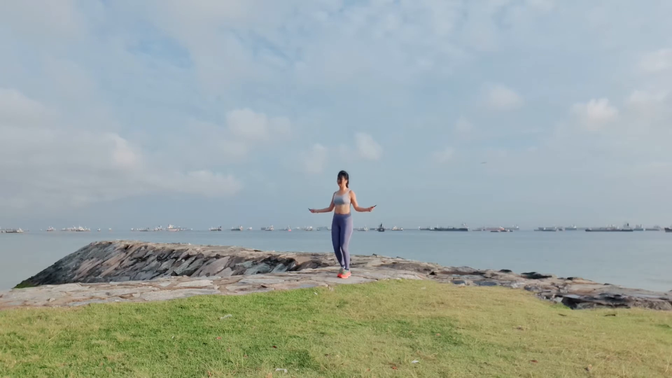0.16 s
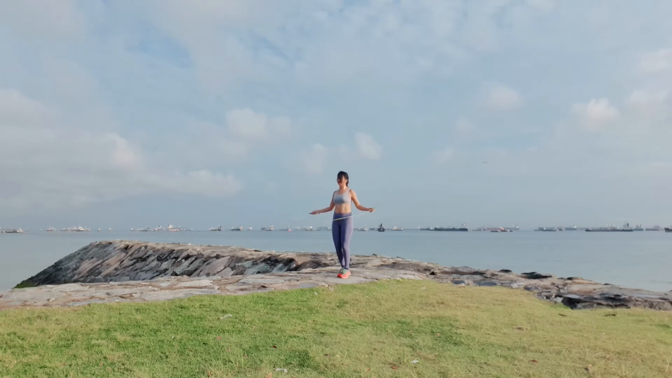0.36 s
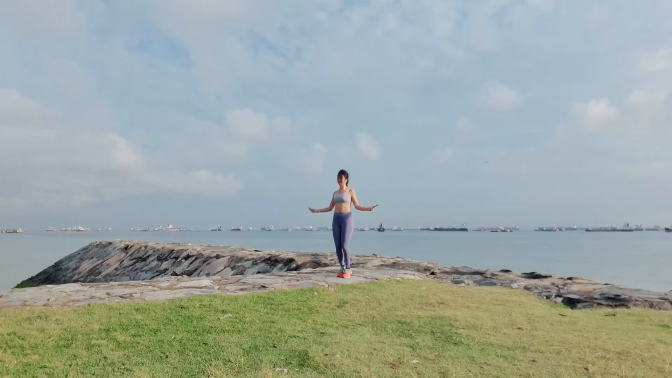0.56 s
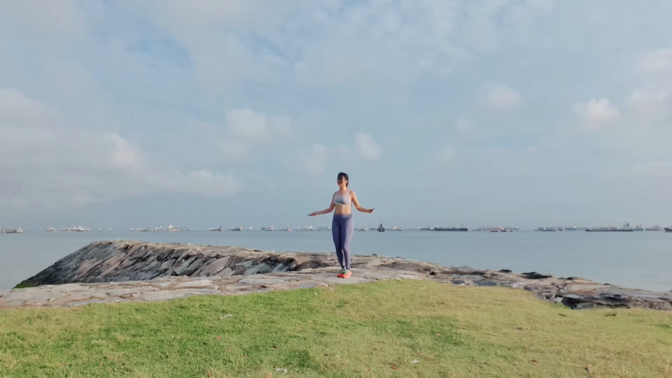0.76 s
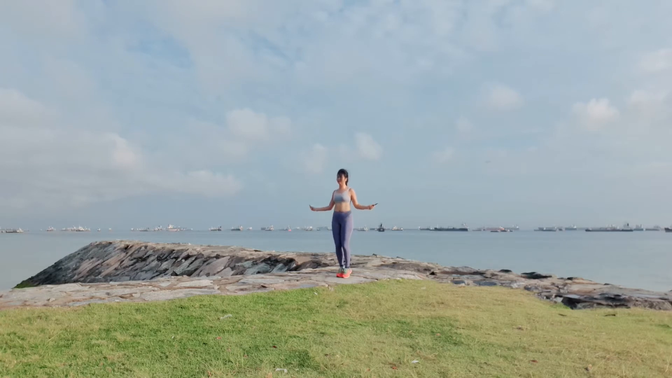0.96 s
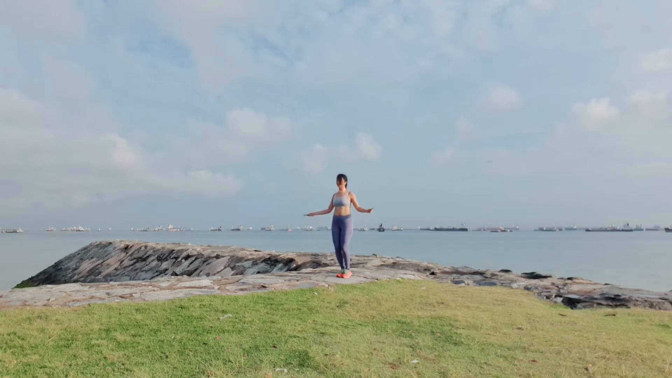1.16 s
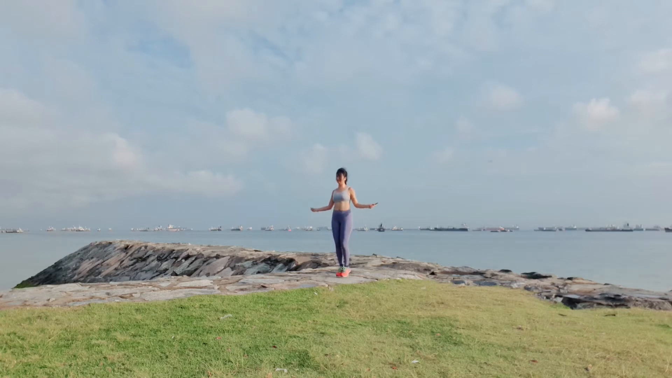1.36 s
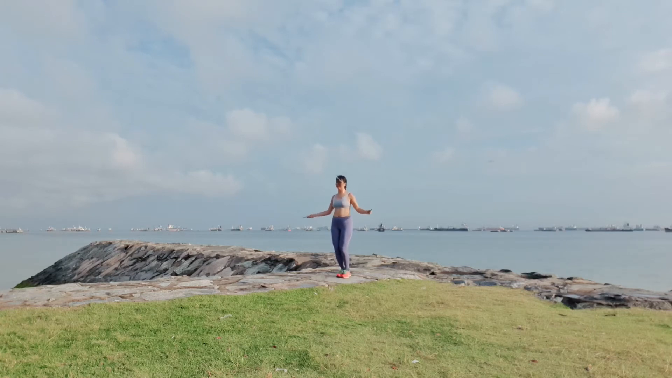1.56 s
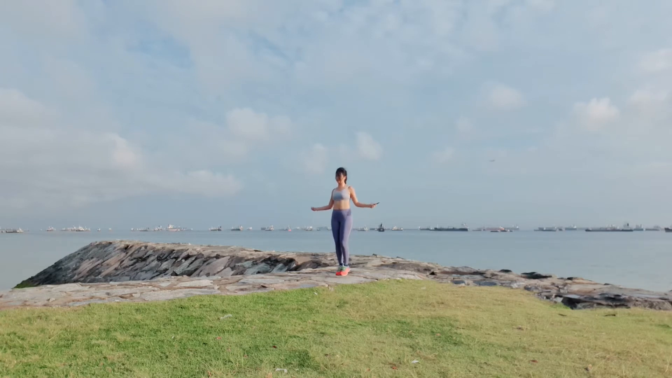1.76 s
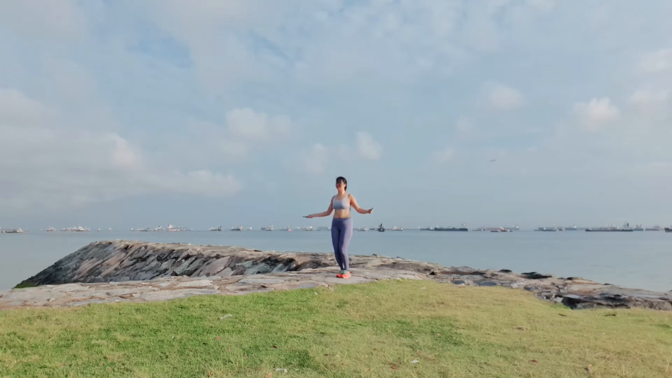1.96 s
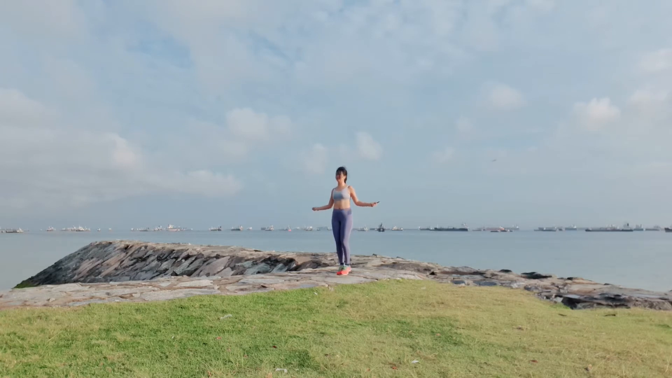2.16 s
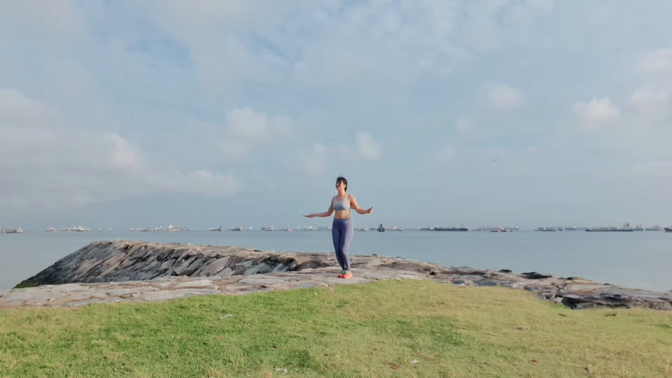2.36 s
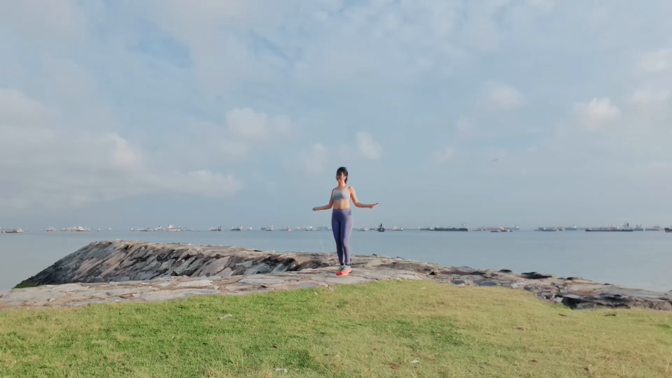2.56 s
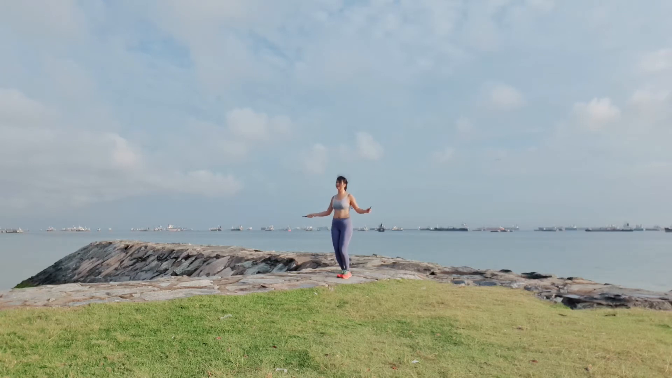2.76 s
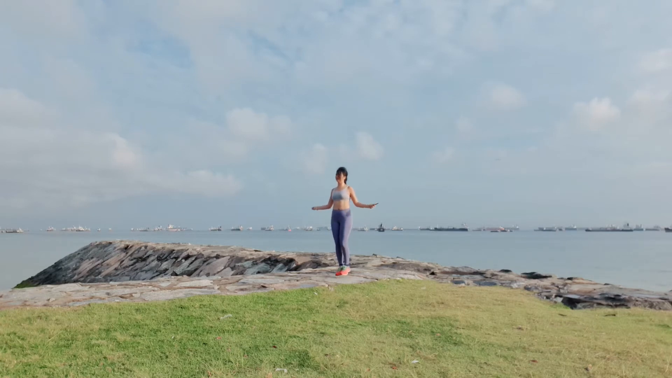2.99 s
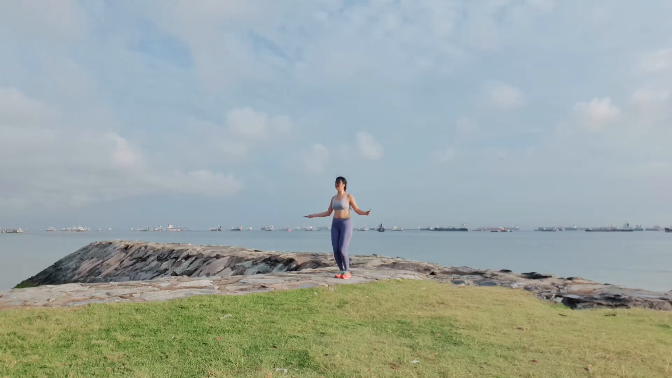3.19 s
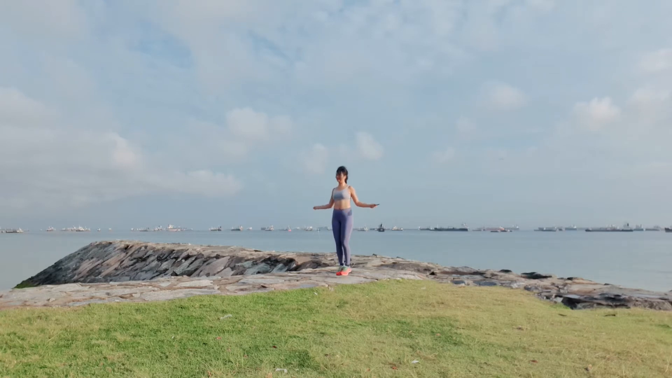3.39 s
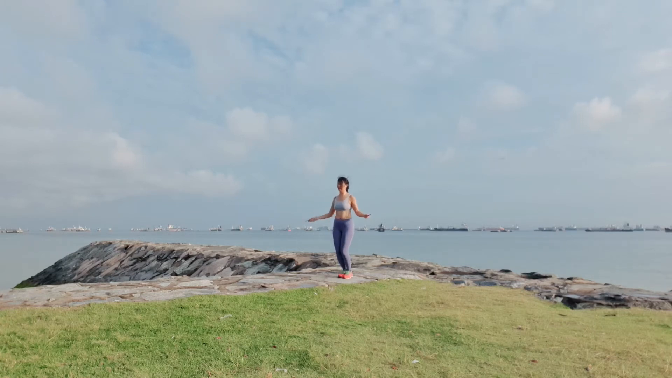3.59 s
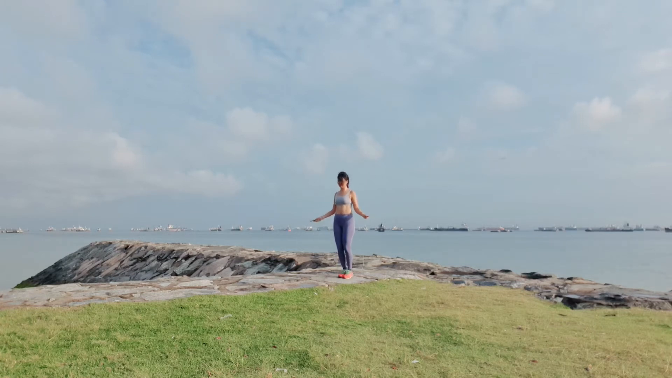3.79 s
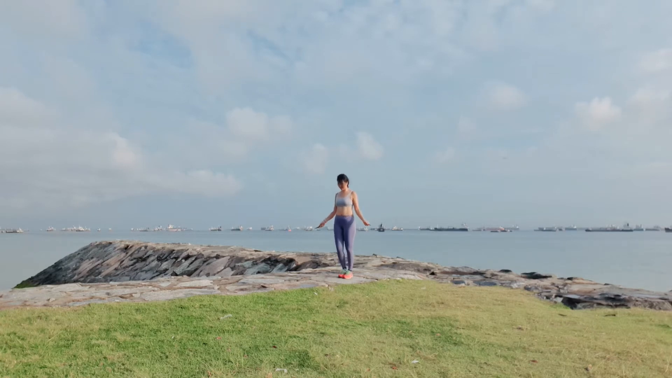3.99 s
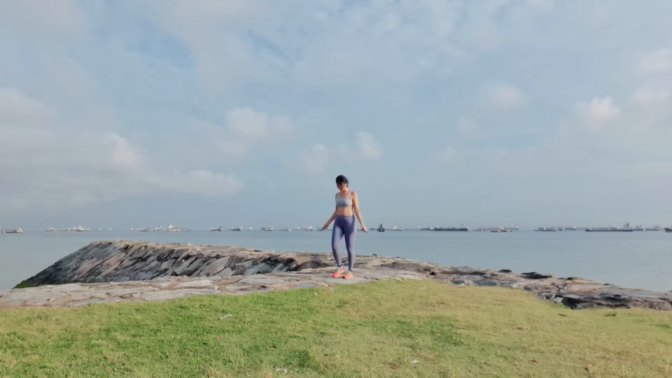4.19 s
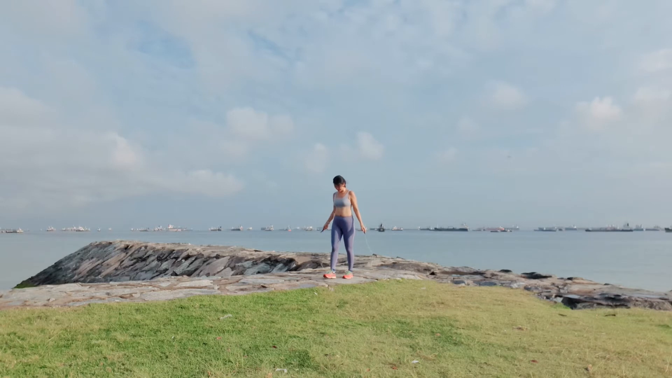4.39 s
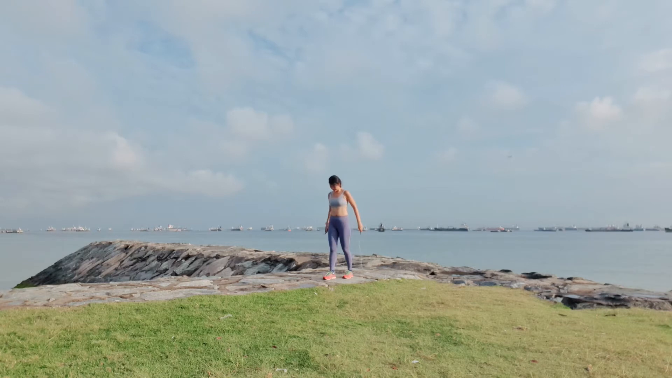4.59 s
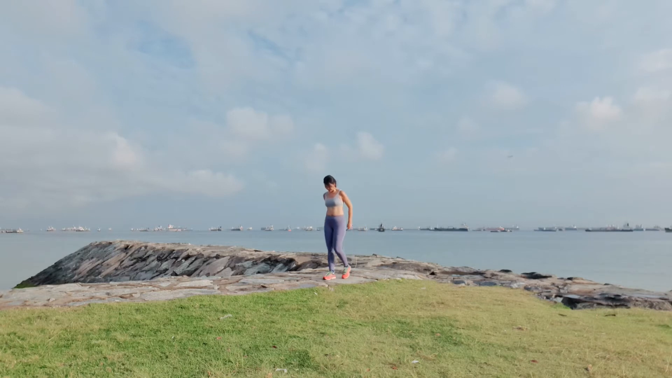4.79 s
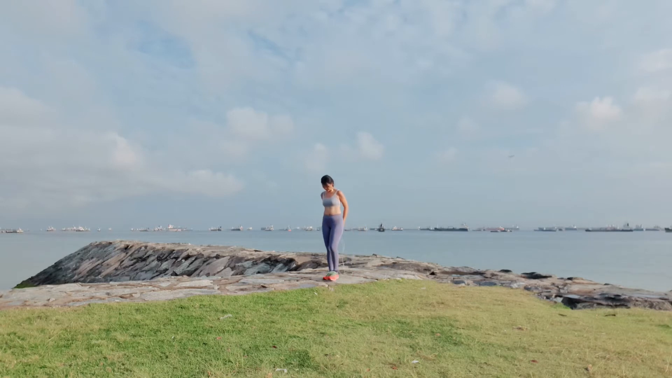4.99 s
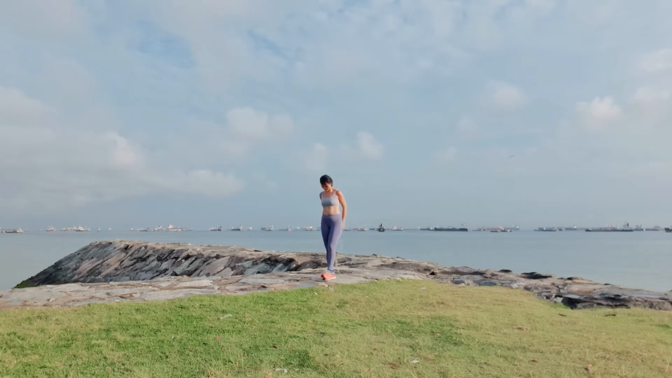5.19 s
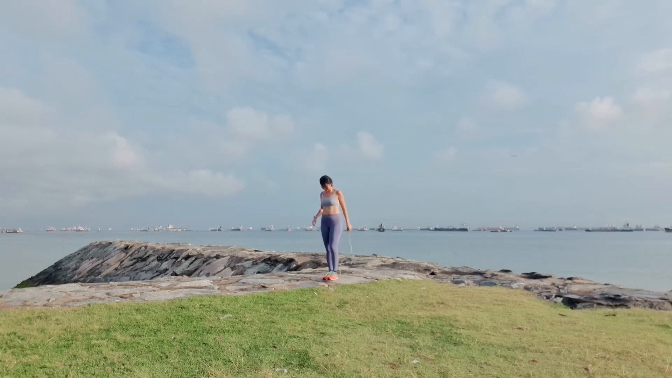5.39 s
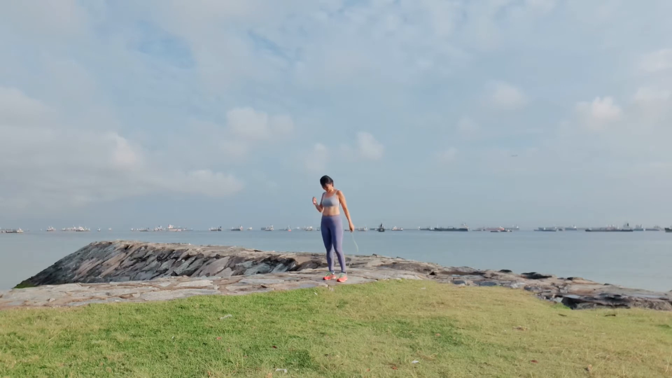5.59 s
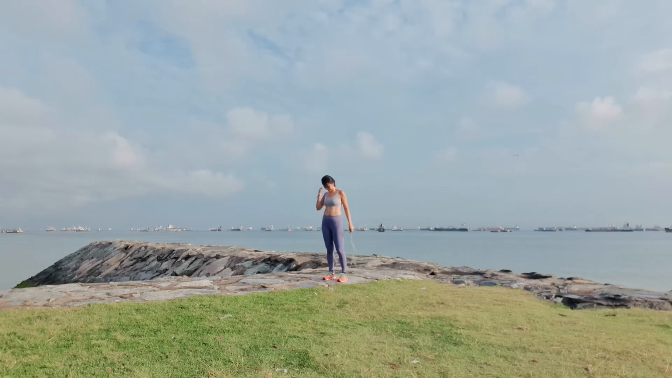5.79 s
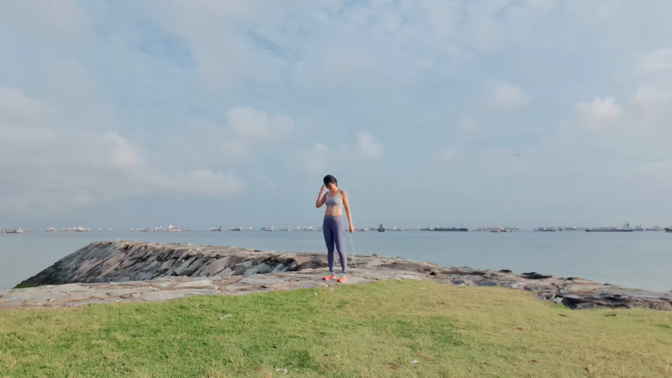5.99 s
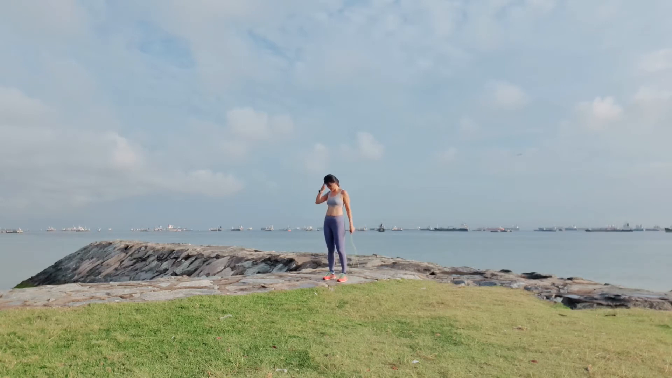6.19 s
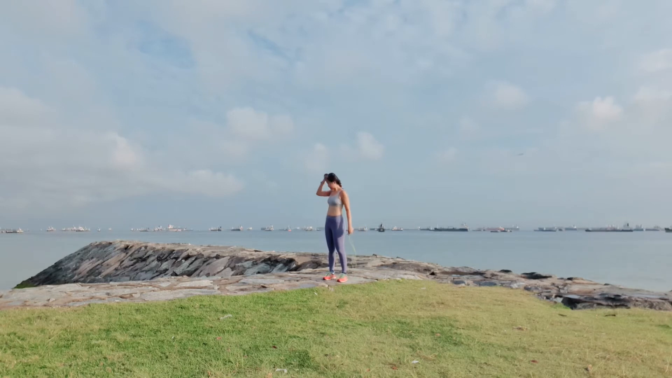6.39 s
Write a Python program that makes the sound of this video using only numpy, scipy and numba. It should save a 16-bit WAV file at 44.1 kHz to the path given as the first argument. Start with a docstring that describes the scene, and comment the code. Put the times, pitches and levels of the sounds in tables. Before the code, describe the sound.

Outdoors by the sea, a skipping rope slaps stone some metres away, a bright dry tick about every 0.4 seconds, each followed by a soft dull landing knock. Small birds chirp faintly in between. Around four seconds the skipping breaks off with a few shoe taps. Deep, uneven wind rumble and a wavering low boom dominate the stereo microphones throughout, with faint flickering sea hiss.

```python
"""A stone jetty by the sea, a skipping rope slapping it some metres off, two microphones a hand apart.
A deep, windy rumble throbs around a wavering boom, and the hiss of the sea flickers band by band.
Rope and shoes are cracks and bursts of grit ringing fixed modes; landings are dull knocks.
Small birds call, low and high: sliding sine whistles with unsteady level and a scattered echo."""
import sys
import numpy as np
from scipy import signal
from scipy.fft import rfft, irfft
from scipy.io import wavfile
from scipy.ndimage import uniform_filter1d
from numba import njit

SR = 44100
rng = np.random.default_rng(int(sys.argv[2]) if len(sys.argv) > 2 else 0)


def unload_wav(signal):
    """Save mono or channel-first audio to the path in sys.argv[1] as 16-bit WAV at rate SR, clipped to [-1, 1]."""
    wavfile.write(
        sys.argv[1],
        SR,
        np.round(np.clip(np.atleast_2d(signal).T, -1, 1) * 32767).astype(np.int16),
    )


N = 284445  # length in samples
PAIR_LAG = 19  # samples across the microphone pair


def undb(db):
    """Decibels to gain."""
    return 10 ** (np.asarray(db) / 20)


def unit(x):
    """Scaled to rms 1."""
    return x / np.sqrt(np.mean(x ** 2))


@njit
def svf(x, hz, width):
    """State-variable filter with a moving centre: low and band outputs."""
    low, band = np.empty(len(x)), np.empty(len(x))
    band_state, low_state = 0., 0.
    for i in range(len(x)):
        g = np.tan(np.pi * hz[i] / SR)
        k = width[i] / hz[i]
        v = (band_state + g * (x[i] - low_state)) / (1 + g * (g + k))
        low[i] = low_state + g * v
        band[i] = k * v
        band_state, low_state = 2 * v - band_state, low_state + 2 * g * v
    return low, band


def resonate(x, hz, width):
    """One fixed resonance."""
    centre = np.full(len(x), min(hz, .45 * SR))
    return svf(x, centre, np.full(len(x), 1. * width))[1]


def band_noise(lo_hz, hi_hz, count=N):
    """Steeply band-limited noise of rms 1."""
    sos = signal.butter(3, [lo_hz, hi_hz], "band", fs=SR, output="sos")
    return unit(signal.sosfilt(sos, rng.standard_normal(count)))


def pair(make, likeness):
    """Left and right from a shared and an opposed part."""
    c = np.clip(likeness, 0, 1)
    shared = np.sqrt(1 + c) * make()
    opposed = np.sqrt(1 - c) * make() * np.array([[1], [-1]])
    return (shared + opposed) / np.sqrt(2)


def walk(rate):
    """Random levels held 1 / rate s and slewed twice; spread 1."""
    k = int(SR / rate)
    held = np.repeat(rng.standard_normal(N // k + 1), k)
    return unit(uniform_filter1d(uniform_filter1d(held, k), k)[:N])


def curves(table):
    """Columns of a table after its times, one value a sample."""
    s, *columns = np.transpose(table)
    return [np.interp(np.arange(N) / SR, s, c) for c in columns]


def add(out, s, sound):
    """Mixes a sound in at time s."""
    i = int(s * SR)
    out[:, i:i + sound.shape[-1]] += sound[..., :N - i]


# The deep boom, perhaps a far ship's engine, as the right microphone hears it.
# Each row: time in seconds, level in dB.
BOOM_SWELL = [(0, -28), (.15, -31), (.32, -35), (.45, -29), (1.15, -31), (1.3, -56), (1.65, -51),
              (1.8, -30.5), (1.95, -51), (2.4, -33.5), (2.55, -41), (2.95, -41), (3.1, -31), (3.35, -31),
              (3.6, -35.5), (3.75, -30), (4.0, -33.5), (4.1, -42.5), (4.45, -42), (4.6, -26.5), (4.75, -31),
              (4.9, -42.5), (5.12, -41.5), (5.25, -26), (5.35, -56), (5.5, -41.5), (5.9, -49),
              (6.05, -43.5), (6.45, -51)]
BOOM_HZ, BOOM_WAVER = 74.48, .02  # pitch and the rms share it wavers by


def boom():
    """A sine of wavering pitch that swells and fades."""
    level_db, = curves(BOOM_SWELL)
    hz = BOOM_HZ * (1 + BOOM_WAVER * walk(15))
    return np.sqrt(2) * np.sin(2 * np.pi * np.cumsum(hz) / SR) * undb(level_db)


# The rumble around the boom, before the random throbbing of its low part.
# Each row: time in seconds, level of the low rumble in dB, level of the upper rumble in dB.
RUMBLE_SWELL = [(0, -31.5, -36), (.12, -35, -38), (.8, -31.5, -39.5), (1.4, -34, -41), (1.7, -35, -38.5),
                (2.0, -35, -41.5), (2.4, -32, -36.5), (2.52, -39.5, -45), (2.8, -32.5, -42),
                (3.5, -34.5, -43.5), (4.3, -34.5, -44), (5.5, -33, -44.5), (5.95, -34.5, -41),
                (6.05, -48.5, -49.5), (6.18, -42.5, -44), (6.45, -45, -43.5)]
# The rumble's rough top, before its random flicker. Each row: time in seconds, level in dB.
FRINGE_SWELL = [(0, -57.5), (.75, -57.5), (.95, -69.5), (1.7, -62.5), (2.1, -61.5), (2.8, -61.5),
                (3.6, -65.5), (4.6, -75.5), (5.2, -62.5), (6.05, -72), (6.3, -58), (6.45, -69)]
THROB_DB, THROB_PER_S = 2, 12  # rms depth and rate of the random throbbing
DEEP_DB, MID_DB = -39.5, -38.5  # rumble below and above the boom, before throb and swell
FOLLOW = .4  # share of the low rumble's swell, in dB, that these two follow
# the top of the upper rumble rises with its level
EDGE_HZ, EDGE_AT_DB, EDGE_HZ_PER_DB = 313.4, -45, 10.5


def rumble():
    """Throbbing low noise around the boom; the broad noise above it dulls as it fades."""
    low_db, upper_db = curves(RUMBLE_SWELL)
    fringe_db, = curves(FRINGE_SWELL)

    def throb():
        return undb(THROB_DB * walk(THROB_PER_S))

    low = undb(low_db) * pair(lambda: band_noise(54.3, 98.1), 0.88) * throb()
    deep = undb(DEEP_DB) * pair(lambda: band_noise(34.0, 58.2), 0.41) * throb()
    mid = undb(MID_DB) * pair(lambda: band_noise(61.8, 191.4), 0.89) * undb(0.97 * walk(12))
    swell = undb(FOLLOW * (low_db - low_db.mean()))
    edge_hz = EDGE_HZ + EDGE_HZ_PER_DB * (uniform_filter1d(upper_db, size=SR // 2) - EDGE_AT_DB)

    def dulled_noise():
        x = band_noise(211.4, 640)
        for damping in (2.0, 2.0, 1.2, 0.76):
            x = svf(x, edge_hz, damping * edge_hz)[0]
        return unit(x)

    upper = undb(upper_db) * pair(dulled_noise, 0.92)
    fringe = undb(fringe_db + 3.0 * walk(14)) * pair(lambda: band_noise(430, 696), 0.55)
    total = boom() + low + swell * (deep + mid) + upper + fringe
    return total * undb([[-.8], [0]])  # a little weaker on the left


# Colour of the far sea, relative, before its flicker. Each row: frequency in Hz, density in dB per Hz.
SEA_COLOUR = [(300, -3), (520, -7), (800, -8.5), (1100, -5), (1350, -1.5), (1550, -5), (2200, -12.5),
              (2900, -17.5), (3150, -21.5), (4950, -34.5), (5500, -36), (9500, -45), (14600, -52.5),
              (16000, -61.5)]
SEA_DB = -50  # gain on the mixed and flickering hiss


def sea():
    """Far hiss from the left, the right and all around; narrow bands flicker each on its own."""
    hz = np.arange(N // 2 + 1) * SR / N
    points = np.array(SEA_COLOUR)
    colour = undb(np.interp(np.log(hz + 1), np.log(points[:, 0]), points[:, 1], left=-80))
    left, right, *around = (unit(irfft(rfft(rng.standard_normal(N)) * colour, N)) for _ in range(4))
    # a source to one side reaches the far microphone later
    from_left = 0.61 * np.array([left, np.roll(left, PAIR_LAG)])
    from_right = 0.3 * np.array([np.roll(right, PAIR_LAG // 2), right])
    spectrum = rfft(from_left + from_right + 0.72 * np.array(around))
    octave = np.log2(hz / 400 + 1e-9)
    out = 0
    for k in range(19):
        share = np.clip(1 - abs(3 * octave - k + 1), 0, 1)  # overlapping third-octave bands
        out = out + irfft(spectrum * share, N) * undb(1.6 * walk(20))
    return undb(SEA_DB) * out


def lapping(count, db):
    """Faint brief tones, rising slightly, fleck the hiss like far water among the rocks."""
    out, t = np.zeros((2, N)), np.arange(SR // 20) / SR
    fade = np.exp(-t / .015) * np.minimum(t / .004, 1) * (1 - t / t[-1])
    for when, pitch, size, side in rng.random((count, 4)):
        hz = 1100 * 2 ** pitch
        ring = np.sin(2 * np.pi * hz * t * (1 + .5 * t)) * fade
        lag = int((2 * side - 1) * PAIR_LAG)
        add(out, when * N / SR, undb(db - 8 * size) * np.array([ring, np.roll(ring, lag)]))
    return out


WIDEN = 1.9, 1.4  # the two passes through each mode, as multiples of its tabled width


def touches(table, modes, crack, ring_s, body_hz, likeness):
    """Each touch is a crack and a spray of grit (t60 ring_s) ringing the modes; body lies below body_hz."""
    out, t = np.zeros((2, N)), np.arange(2048) / SR
    decay = np.exp(-np.log(1000) * t / max(ring_s, .003))
    for s, db, treble_db, body_db, second_db in table:
        push = pair(lambda: rng.standard_normal(len(t)), likeness) * decay
        push[:, :60] *= np.linspace(0, 1, 60) ** 2  # the touch spreads before it cracks
        push[:, 60] += crack
        sound = np.zeros((2, len(t)))
        for k, (hz, width, mode_db) in enumerate(modes):
            gain_db = mode_db + treble_db * (hz > 8000) + body_db * (hz < body_hz) + second_db * (k == 1)
            gain = (-1) ** k * undb(gain_db)  # neighbouring modes in opposite phase
            for side in range(2):
                once = resonate(push[side], hz, WIDEN[0] * width)
                sound[side] += gain * resonate(once, hz, WIDEN[1] * width)
        loudness = np.sqrt(np.mean(sound[:, 30:160] ** 2))  # rms around the crack
        add(out, s - 60 / SR, sound * undb(db) / loudness)
    return out


# Rope on stone, each touch of a slap, before the skipper is placed. Each row: crack time in seconds,
# level in dB, then boosts in dB of the modes above 8 kHz, of the body and of the second mode.
ROPE_TOUCHES = [(0.1749, -51.5, 1, -4, 1), (0.1812, -60, -2, -5, 0), (0.596, -49, 2, 9.5, -11),
                (1.0085, -72, 5, -8, 0), (1.0102, -66, 0, -8, 0), (1.0176, -50, 3, -2.5, 1),
                (1.0201, -60, 1, -1, 0), (1.0319, -56, -20, 20, -11), (1.4379, -54.5, -1, -9, 0),
                (1.4404, -62, 6, -5, 0), (1.8523, -49.5, -4, -3, 6), (1.8554, -59, 5, -2, 0),
                (2.2676, -60, 5, 2, -2), (2.2691, -55, 7, -1, -4), (2.2712, -57, 1, 4, -1),
                (2.6917, -53.5, 2, -3, 0), (2.6936, -57.5, -2, -6, 1), (3.1167, -49.5, -0.5, -5.5, 3.5),
                (3.1236, -57, 0, -9, 5), (3.5376, -49.5, 0, -14, 1), (3.5503, -58, -8, 3, 1),
                (3.5572, -60, -14, 2, 3), (3.5600, -57, -6, 6, -3), (3.5612, -61, -6, 4, -3),
                (3.566, -61, -15, 12, -8), (3.6852, -67.5, -8, 0, -4)]
# Modes of rope on stone. Each row: centre in Hz, width in Hz before widening, gain in dB before boosts.
ROPE_MODES = [(3300, 700, -5), (4230, 1000, 3.5), (5800, 1500, -5.5), (7200, 1200, -1), (9330, 960, -19.5),
              (10950, 2200, -5.5), (12900, 1400, -12), (14740, 2000, -4)]
ROPE_LAG_S = 1.4e-5  # the rope reaches the right microphone a little later


def rope_slaps():
    """The rope cracks on the stone and its grit rings bright modes."""
    left, right = touches(ROPE_TOUCHES, ROPE_MODES, crack=3.7, ring_s=0.015, body_hz=5000, likeness=0.27)
    turn = np.exp(-2j * np.pi * np.arange(N // 2 + 1) * SR / N * ROPE_LAG_S)
    return np.array([left, irfft(rfft(right) * turn, N)])


# Dull knocks of the landings, before the skipper is placed.
# Each row: start in seconds, peak level in dB, centre in Hz.
LANDINGS = [(.289, -45, 900), (.705, -42, 900), (1.122, -41, 750), (1.964, -42, 1000), (2.817, -40, 700),
            (3.228, -40, 650), (3.545, -34, 950), (3.635, -37.5, 800)]
KNOCK_RING_S, HEEL_S = .017, .0004  # t60 of the blow's noise; length of the heel's push


def landing_knocks():
    """A softened blow, heel first, rings one broad low resonance twice over."""
    out, t = np.zeros((2, N)), np.arange(2048) / SR
    for s, db, hz in LANDINGS:
        blow = rng.standard_normal(len(t)) * np.exp(-np.log(1000) * t / KNOCK_RING_S)
        blow[0] += 20.  # the heel lands first
        soft = np.convolve(blow, np.hanning(int(HEEL_S * SR)))[:len(t)]
        thud = resonate(resonate(soft, hz, .75 * hz), hz, .75 * hz)
        add(out, s, undb(db) * thud / np.abs(thud).max())
    return out


# Duller taps of shoes and handles, before the skipper is placed. Each row: crack time in seconds,
# level in dB, then boosts in dB of the modes above 8 kHz, of the body and of the second mode.
SHOE_TOUCHES = [(0.2897, -63, -25, -9, 13), (0.7057, -65, -25, -6, 16), (1.1221, -63, -22, -7, 6),
                (1.7758, -58, -18, -12, 2), (1.7804, -60, -25, -6, 2), (1.9643, -64, -26, -7, 4),
                (2.6213, -54.5, -19, -4, 10), (2.6227, -53, -23, -5, 9), (2.8173, -61, -37, 1, 4),
                (3.0303, -50, -21, -2.5, -8), (3.5447, -53, -17, -10, 15), (3.6345, -64, -30, -14, -1),
                (3.9635, -71, -19, -10, 0), (4.2747, -53, -19, -5, -2)]
# Modes of a tap. Each row: centre in Hz, width in Hz before widening, gain in dB before boosts.
SHOE_MODES = [(2930, 220, 11.5), (3700, 500, -7.5), (4450, 1500, -6.5), (7200, 2500, -26.5),
              (11000, 3000, -3.5), (15000, 2000, -6.5)]


def shoe_taps():
    """Shoes and handles tap the stone: a weaker crack, longer grit and less treble."""
    return touches(SHOE_TOUCHES, SHOE_MODES, crack=2.8, ring_s=.022, body_hz=3500, likeness=0.82)


def bird_tail():
    """Scattered echoes of a call: noise that builds up over 25 ms and dies away."""
    t = np.arange(SR // 4) / SR
    return rng.standard_normal((2, len(t))) * undb(-31.5) * np.exp(-t / 0.06) * np.clip(t / 0.025, 0, 1)


# Far birds, short sliding notes. Each row: start in seconds, length in seconds, start pitch in Hz,
# end pitch in Hz, peak level in dB before roughness and echo, roughness from 0 to 1.
LOW_BIRD_NOTES = [(0.544, 0.05, 3020, 2700, -62, 0.3), (.622, .02, 3190, 3080, -70, .6),
                  (0.645, 0.022, 3050, 2720, -60, 0.3), (0.78, 0.038, 3020, 2720, -62, .2),
                  (0.817, 0.031, 2850, 2680, -64, 0.4), (1.878, 0.053, 2960, 2540, -58.5, .3),
                  (1.98, 0.018, 2550, 2670, -59, .5), (2.022, 0.05, 3000, 2670, -62, .2),
                  (2.086, 0.036, 3000, 2740, -61, 0.2), (2.639, 0.034, 3020, 2800, -59, 0.2),
                  (2.67, 0.036, 2820, 2720, -61, 0.3), (2.739, 0.041, 3000, 2820, -59.5, .3),
                  (2.783, 0.024, 2900, 3000, -63, 0.4), (2.815, 0.035, 2940, 2900, -62.5, .6),
                  (2.867, .04, 2950, 2530, -61, 0.5), (3.882, 0.045, 3130, 2980, -71, 0.4),
                  (3.925, 0.031, 2960, 2920, -71, 0.3), (3.974, 0.042, 2960, 2910, -67, .2),
                  (4.068, .06, 2960, 2810, -69, .3), (4.192, .05, 3100, 3020, -69, .4),
                  (3.36, .02, 3700, 4260, -70.5, .8), (3.394, 0.015, 4600, 5250, -73, .6),
                  (3.412, .016, 4800, 5150, -75, .8), (3.44, 0.018, 3720, 3800, -68, 0.5)]


def low_birds():
    """Sliding sines roughened by noise in their level, with a fainter scattered tail."""
    dry_notes = np.zeros((2, N))
    for s, length, start_hz, end_hz, db, rough in LOW_BIRD_NOTES:
        n = int(length * SR)
        phase = 2 * np.pi * np.cumsum(np.linspace(start_hz, end_hz, n)) / SR
        roughness = 1 + rough * band_noise(40, 400, count=n)
        add(dry_notes, s, undb(db) * np.hanning(n) ** 0.3 * roughness * np.sin(phase))
    return dry_notes + undb(-8.5) * signal.fftconvolve(dry_notes, bird_tail(), axes=1)[:, :N]


# Soft brushing of soles and cloth, before the skipper is placed.
# Each row: start in seconds, length in seconds, centre in Hz, width in Hz, level in dB before the swell.
BRUSHES = [(3.33, 0.07, 3900, 1200, -70), (3.37, 0.14, 4600, 1800, -71), (3.95, .11, 4300, 900, -76),
           (5.71, .07, 8700, 9600, -76), (5.37, 0.033, 9700, 5060, -80)]


def brushing():
    """Band-limited hiss that swells softly and falls."""
    out = np.zeros((2, N))
    for s, length, hz, width, db in BRUSHES:
        n = int(length * SR)
        hiss = pair(lambda: band_noise(hz - width / 2, hz + width / 2, count=n), 0.48)
        add(out, s, undb(db) * np.hanning(n) * hiss)
    return out


# Thin high bird, one list a call.
# Each row: time in seconds, pitch in Hz, level in dB before flutter and echo.
HIGH_BIRD_CALLS = [
    [(3.592, 7100, -91), (3.6, 6650, -76), (3.612, 6560, -73), (3.636, 6830, -72), (3.658, 6540, -73),
     (3.665, 6500, -96)],
    [(3.855, 6960, -91), (3.865, 7200, -73.5), (3.884, 7600, -70), (3.896, 7900, -76), (3.905, 7950, -92)],
    [(4.026, 8750, -84), (4.032, 8300, -76), (4.04, 6900, -73), (4.046, 6600, -74), (4.055, 6450, -72),
     (4.068, 6930, -72), (4.092, 6980, -70), (4.104, 6650, -73), (4.115, 6500, -95)],
]
BIRD_ECHO_S, BIRD_ECHO_DB = .075, -15  # one faint distinct echo
BIRD_FLUTTER = .15  # rms unsteadiness of its level


def high_bird():
    """A near-sine whistle off to the left, reaching that microphone first, smeared by echoes."""
    whistle = np.zeros((1, N))
    for call in HIGH_BIRD_CALLS:
        s, hz, db = np.transpose(call)
        t = np.arange(s[0], s[-1], 1 / SR)
        phase = 2 * np.pi * np.cumsum(np.interp(t, s, hz)) / SR
        flutter = 1 + BIRD_FLUTTER * band_noise(30, 200, count=len(t))
        add(whistle, s[0], np.sqrt(2) * undb(np.interp(t, s, db)) * flutter * np.sin(phase))
    direct = np.vstack([whistle, np.roll(whistle, PAIR_LAG)])
    smear = signal.fftconvolve(np.repeat(whistle, 2, axis=0), bird_tail(), axes=1)[:, :N]
    echo = undb(BIRD_ECHO_DB) * np.roll(whistle, int(BIRD_ECHO_S * SR))
    return direct + smear + echo


def rock_scatter(sound):
    """The rocks around scatter each touch into a faint short tail."""
    t = np.arange(SR // 20) / SR
    rocks = undb(-39) * rng.standard_normal((2, len(t))) * np.exp(-t / 0.017)
    return signal.fftconvolve(sound, rocks, axes=1)[:, :N]


def scene():
    """The skipper stands ahead, a little louder on the right, amid sea, rumble and birds."""
    surroundings = rumble() + sea() + lapping(count=160, db=-54)
    rope_and_shoes = rope_slaps() + shoe_taps()
    skipper = rope_and_shoes + landing_knocks() + brushing() + rock_scatter(rope_and_shoes)
    return surroundings + skipper * undb([[-2.5], [0]]) + low_birds() + high_bird()


def record(dry):
    """The recorder cuts the top steeply above 16 kHz."""
    return signal.sosfilt(signal.ellip(8, .2, 70, 16000, fs=SR, output="sos"), dry)


dry = scene()
out = record(dry)
unload_wav(out)
```